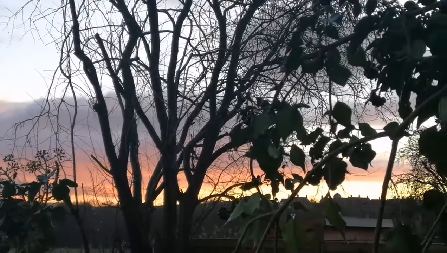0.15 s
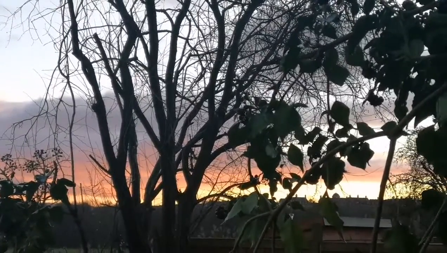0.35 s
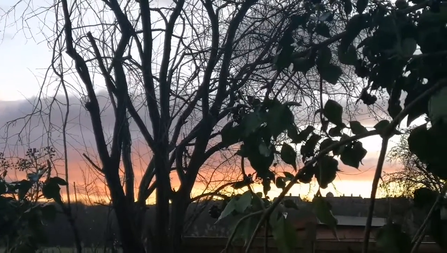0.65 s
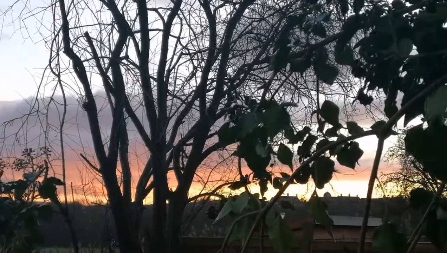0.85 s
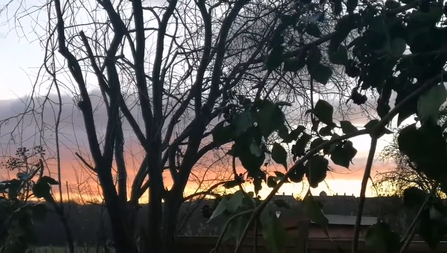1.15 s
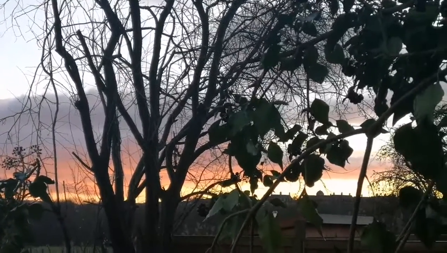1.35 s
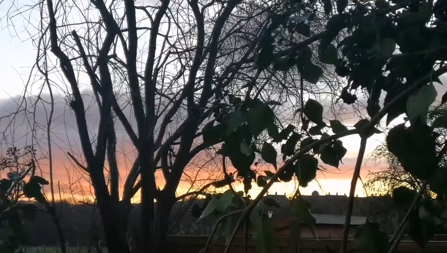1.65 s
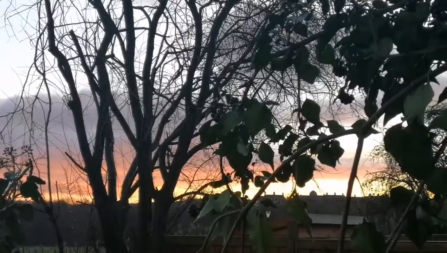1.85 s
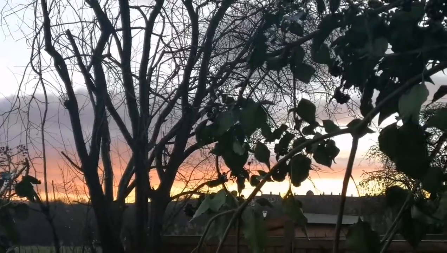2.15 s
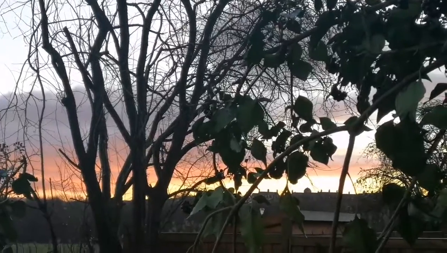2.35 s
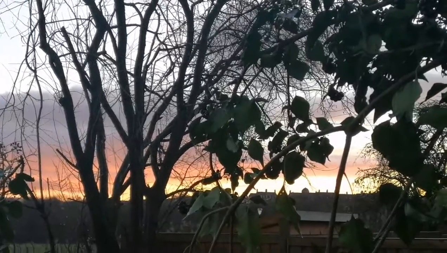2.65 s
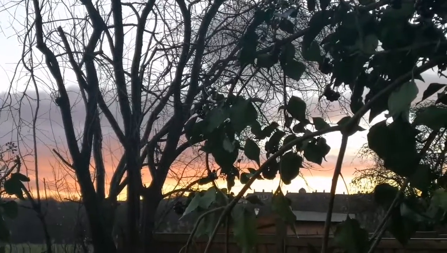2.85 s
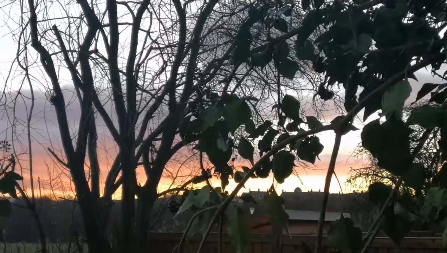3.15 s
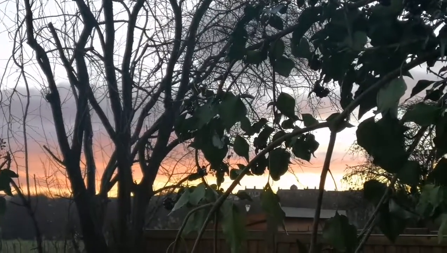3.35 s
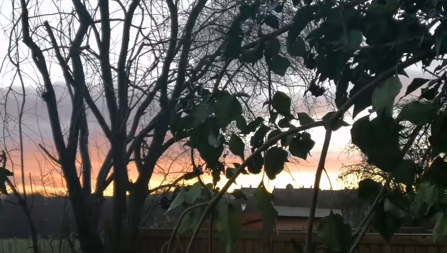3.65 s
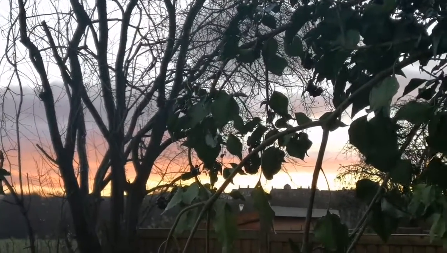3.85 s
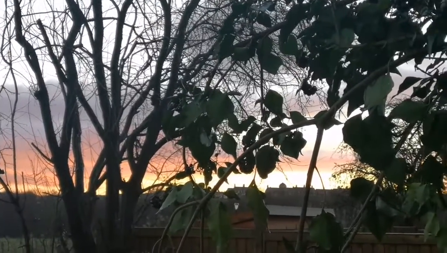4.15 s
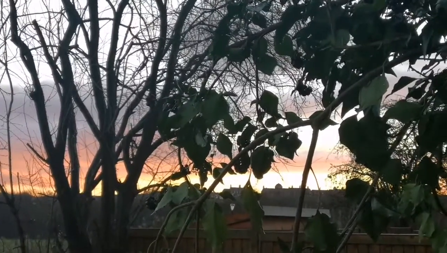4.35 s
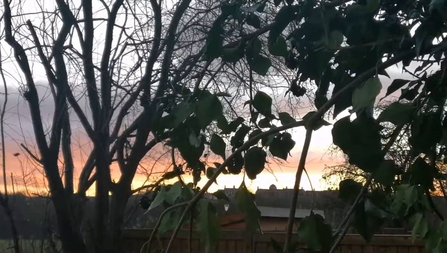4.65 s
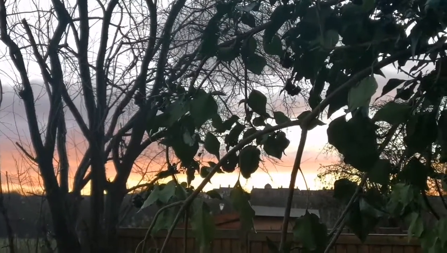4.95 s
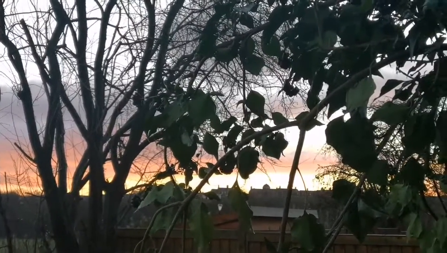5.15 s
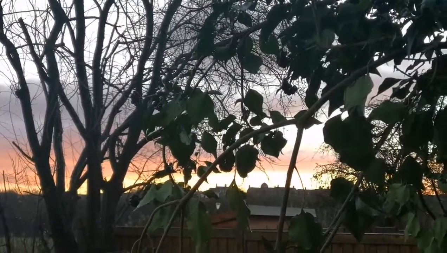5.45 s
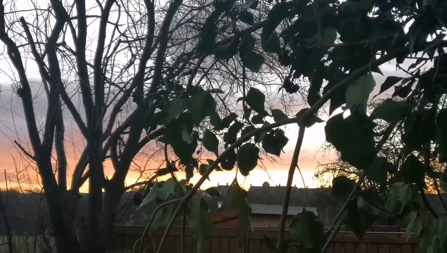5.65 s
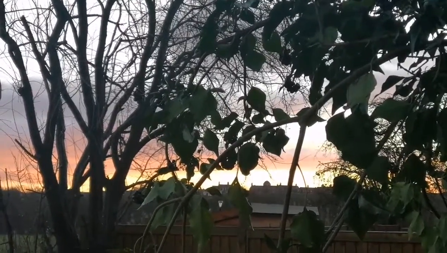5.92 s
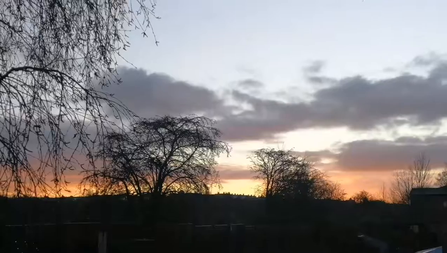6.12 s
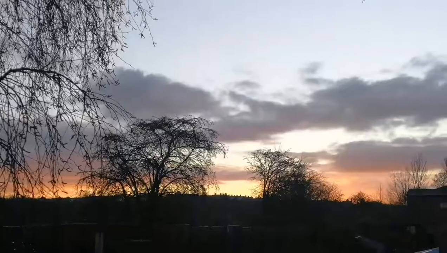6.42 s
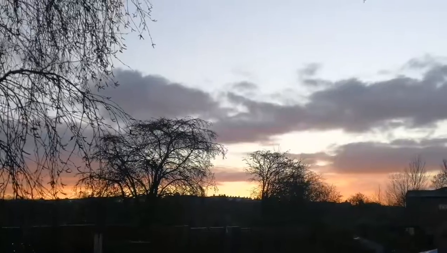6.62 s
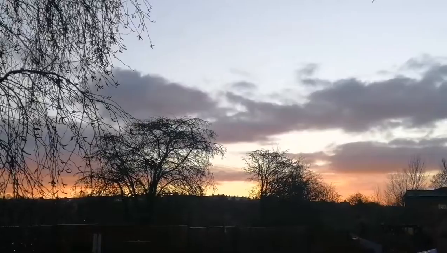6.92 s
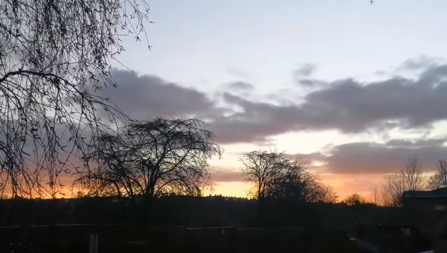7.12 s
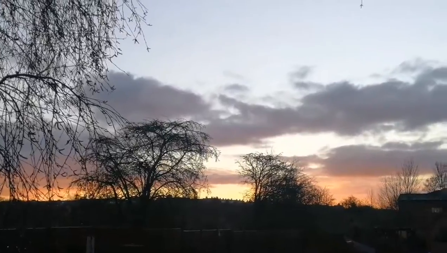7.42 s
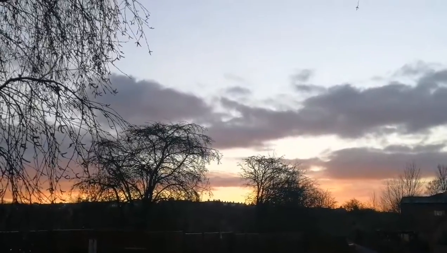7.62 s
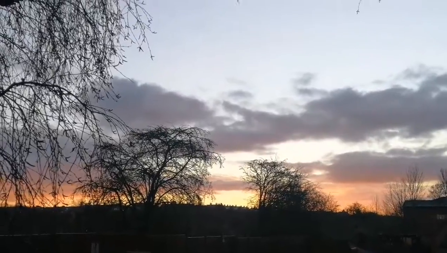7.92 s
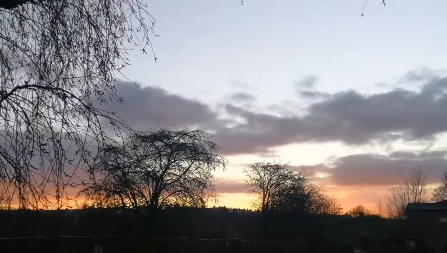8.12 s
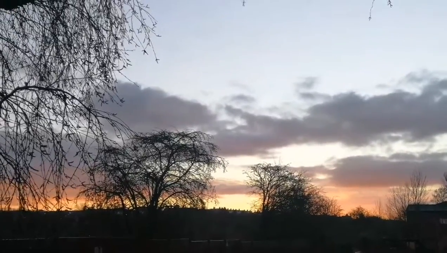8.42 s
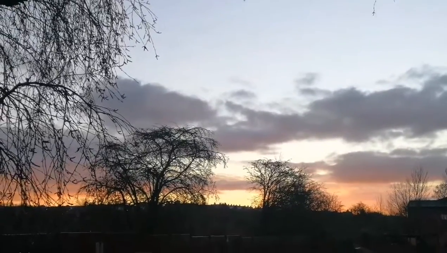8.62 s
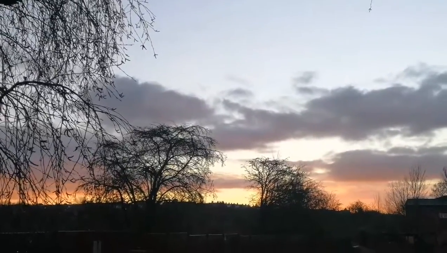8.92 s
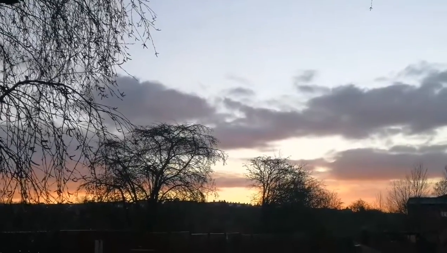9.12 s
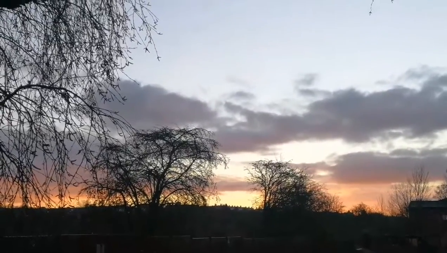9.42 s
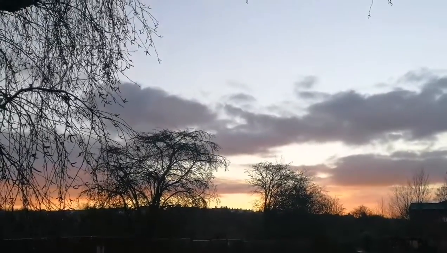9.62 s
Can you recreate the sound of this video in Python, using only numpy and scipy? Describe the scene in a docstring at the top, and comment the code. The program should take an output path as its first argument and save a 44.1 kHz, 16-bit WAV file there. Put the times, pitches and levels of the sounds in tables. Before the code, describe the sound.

Sparse robin phrases and faint far birds over a hushed dawn garden, with soft handling bumps, then a small motor whirring and one buzzing knock.

```python
"""Dawn in a garden, heard by a hand-held phone. Throughout: filtered-noise air and distant road hush, faint far
birds (warbled sine notes with noise echoes), and from 0.8 s finger bumps (filtered pushes) and ticks (noise
bursts). From 1 s a robin on the left: phrases of warbled sines. At 2.2 s a harsh churr: noise puffs through a
throat filter. At 5.94 s a brief silence; from 6.03 to 8.66 s a small motor, probably the lens drive: noise
repeated every turn, plus gear hum; at 6.24 s one vibrator knock: a ringing sine with rattle. The robin's last
phrase starts at 9 s."""
import sys
import numpy as np
from scipy import signal
from scipy.fft import rfft, irfft, next_fast_len
from scipy.io import wavfile

SR = 44100
rng = np.random.default_rng(int(sys.argv[2]) if len(sys.argv) > 2 else 0)


def log_audio(samples):
    """Write samples as a 16-bit WAV file to the path given in sys.argv[1]."""
    # one column per channel
    frames = np.atleast_2d(samples).T
    # limit to full scale, then quantise
    limited = np.clip(frames, -1, 1)
    pcm = np.round(limited * 32767).astype(np.int16)
    wavfile.write(sys.argv[1], SR, pcm)


N = 431298
TIME = np.arange(N) / SR

# Spectrum of still air: (f/Hz, density/dB per Hz)
AIR_SPECTRUM = [(20, -95), (70, -90), (170, -96.5), (300, -96), (600, -101), (1500, -105), (3000, -109),
                (4500, -111.5), (7000, -113), (9200, -112.5), (11500, -117), (15500, -119)]
# Spectrum of the road before its level curve: (f/Hz, density/dB per Hz)
ROAD_SPECTRUM = [(500, -115), (850, -101), (1200, -93), (1600, -97.5), (2100, -100), (3000, -110),
                 (4500, -125)]
# Slow road level: (t/s, level/dB)
ROAD_LEVEL_DB = [(0, 1.5), (1.5, -1.5), (3, 0.5), (4.5, -1.5), (5.9, -2.5), (8.8, -2), (9.78, -4.5)]
# Syllables of all birds: name -> (glide/octaves, middle above ends/octaves, warble/Hz before whistle's 0.786,
# second voice re first/dB)
SYLLABLE_SHAPES = {"flick": (0.21, 0.06, 50, -9), "rise": (.07, -0.04, 60, -11),
                   "arch": (.07, 0.037, 3, -40), "fall": (-.38, .04, 169, -5),
                   "sag": (-.07, -0.01, 4.5, -40), "trill": (0.05, 0.09, 132, -6),
                   "hold": (0.05, -0.03, 14, -40), "scoop": (.13, -0.12, 5, -40),
                   "slide": (.19, -.03, 12, -40), "droop": (-0.03, .02, 29.5, -18),
                   "zip": (.11, .03, 140, -20), "cup": (.005, -.035, 2, -40), "sigh": (-.09, .03, 25, -40)}
# Far notes, level before the mix: (start t/s, length/s, middle f/Hz, level/dB, syllable)
FAR_NOTES = [ (0.753, .012, 3200, -63, "fall"), (3.386, .24, 3690, -77, "hold"),
             (3.42, 0.22, 3470, -76, "hold"), (3.762, .09, 8450, -67, "zip"),
             (3.876, .15, 8070, -74.5, "sag"), (4.019, .11, 8680, -72.5, "zip"),
             (8.62, 0.17, 3500, -76, "droop"), (8.658, 0.106, 2480, -76.5, "droop"),
             (8.647, 0.15, 1040, -70.5, "hold"), (9.68, .12, 5400, -78, "droop")]
# Repeated two-tone call of one far bird, level before the mix: (start t/s, level/dB)
TWO_TONE_CALLS = [(.419, -82), (1.546, -81), (2.968, -85), (3.782, -74), (4.918, -81)]
# Throat resonances of the churring bird: (f/Hz, level/dB)
THROAT_RESPONSE = [(1200, -30), (1900, 2.5), (2450, 0), (2950, -9.5), (3650, -4.5), (4020, 2), (4400, -2),
                   (4800, -21), (6500, -46)]
# Finger bumps: (t/s, peak of the thud/dB, touch)
FINGER_BUMPS = [ (.882, -48, "tap"), (1.342, -47, "nail"), (1.468, -48, "nail"), (2.242, -48, "tap"),
                (2.294, -46.5, "tap"), (2.447, -31.5, "tap"), (2.63, -44, "tap"), (3.084, -46.5, "nail"),
                (3.425, -43, "tap"), (3.767, -49, "tap"), (4.075, -43.5, "nail"), (4.106, -38, "tap"),
                (5.263, -33, "tap"), (5.599, -43, "tap"), (5.717, -45.5, "tap"), (5.864, -25, "press"),
                (6.041, -42, "squeeze"), (6.11, -39, "press"), (8.002, -31, "tap"),
                (8.097, -35.5, "squeeze"), (8.191, -31, "squeeze"), (9.031, -27.5, "press"),
                (9.649, -30, "press")]
# Finger touches: name -> (upper edge f/Hz, lower edge f/Hz, raw tick re thud/dB, raw shudder re push/dB)
TOUCH_KINDS = {"nail": (560, 134, -3, -9), "tap": (260, 117, -22, -5.5), "press": (350, 36.5, -18.5, -21),
               "squeeze": (97, 54, -43, -11)}
# Dry case ticks and scuffs, with the motor's switch clicks at its start and stop (6.11, 8.66 s), # before
# colouring: (t/s, level/dB, decay/s, treble snap/dB)
CASE_TICKS = [(0.76, -57, .004, 0), (5.867, -29, 0.00033, -40), (6.113, -26, 0.00058, -28),
              (8.661, -29.5, 0.00046, -6), (9.091, -48.5, .007, -14), (9.254, -41.5, .0035, -7),
              (9.268, -47.5, .003, 9.5), (9.275, -56, 0.024, -3)]
# Case response to ticks: (f/Hz, level/dB)
TICK_RESPONSE = [(200, -19), (800, 9.5), (1500, -0.5), (2100, -2.5), (3100, -8.5), (4500, -18.5),
                 (7000, -48), (12000, -59)]
# Treble snap of slips: (f/Hz, level/dB)
SNAP_RESPONSE = [(2500, -23), (5000, -17), (6300, -7), (8000, -18), (11000, -33), (15000, -36)]
# Handling rumble before its level curve: (f/Hz, density/dB per Hz)
RUMBLE_SPECTRUM = [(12, -74.5), (30, -75), (60, -68), (110, -83), (300, -99), (700, -115)]
# Rumble of the unsteady hand: (t/s, level/dB)
HAND_LEVEL_DB = [(0, -21), (1.9, -25), (2.4, -13), (4.8, -22), (5.6, -9.5), (7.8, -16.5), (8.15, -3.5),
                 (9.78, -8)]
# Case response to the vibrator's rattle: (f/Hz, level/dB)
RATTLE_RESPONSE = [(400, -21), (750, 11), (950, -1), (1140, 4.5), (1450, -10), (2100, 7), (2700, -15.5),
                   (3200, -13.5), (6500, -27), (8500, -14), (11500, -38), (15000, -26)]
# Motor through the body, before the effort gain: (f/Hz, left/dB per Hz, right/dB per Hz)
MOTOR_RESPONSE = [(90, -99, -99), (203, -79.5, -77), (322, -77, -73), (404, -71, -73), (468, -80.5, -77),
                  (560, -78, -68), (555, -79.5, -77.5), (804, -85.5, -75), (1310, -90, -79.5),
                  (2130, -99, -84), (4400, -105, -88), (6800, -118, -97.5), (8330, -117, -91),
                  (9410, -120, -92.5), (11900, -130, -119)]
# Humming gears, levels before pan and effort: (teeth, level/dB, catch level/dB, catch place in turn t/s, catch width/s)
HUM_GEARS = [(40, -62, -44.5, 0.044, 0.0049), (50, -70, -56, 0.0014, 0.013), (29, -70, -57, .0935, 0.012)]
# Robin's notes, level before the mix: (start t/s, length/s, middle f/Hz, level/dB, syllable)
ROBIN_NOTES = [ (1.029, .023, 3300, -55, "flick"), (1.046, 0.045, 3430, -46.5, "rise"),
               (1.099, 0.058, 3480, -53.5, "rise"), (1.151, 0.1, 3870, -60, "rise"),
               (1.3, .026, 3300, -52.5, "flick"), (1.325, 0.032, 3400, -53, "flick"),
               (1.367, .055, 3440, -59, "rise"), (4.24, .028, 4030, -69, "flick"),
               (4.279, 0.029, 3420, -55, "hold"), (4.308, .061, 3685, -40.5, "arch"),
               (4.383, .033, 3450, -52, "fall"), (4.406, 0.078, 2660, -56, "sag"),
               (4.492, .03, 3200, -53.5, "trill"), (4.574, 0.049, 3180, -60, "trill"),
               (4.579, 0.025, 4480, -72, "rise"), (4.632, .033, 3900, -65, "trill"),
               (4.665, 0.038, 3830, -54, "fall"), (4.73, 0.048, 3450, -56.5, "trill"),
               (4.791, .17, 3680, -68.5, "droop"), (4.83, 0.19, 3320, -70.5, "droop"),
               (5.09, 0.051, 3400, -59, "trill"), (5.113, .028, 2350, -65, "droop"),
               (5.133, 0.024, 4200, -62, "trill"), (5.149, .035, 3200, -53, "rise"),
               (5.189, .018, 4280, -58.5, "trill"), (5.208, 0.013, 3720, -51.5, "flick"),
               (5.226, .035, 3280, -56.5, "trill"), (5.321, 0.018, 3780, -52, "flick"),
               (5.349, .019, 3650, -49, "scoop"), (5.371, .037, 4000, -53, "trill"),
               (5.431, 0.041, 3920, -57, "flick"), (6.96, .048, 4300, -62, "fall"),
               (7.027, 0.067, 3600, -60.5, "fall"), (7.193, 0.037, 4200, -55, "rise"),
               (7.315, .077, 3450, -56, "sag"), (8.996, .037, 3580, -60, "scoop"),
               (9.06, 0.038, 4180, -54.5, "cup"), (9.154, 0.02, 4480, -58, "cup"),
               (9.238, 0.051, 4010, -60, "sag"), (9.354, 0.11, 3705, -67, "slide"),
               (9.467, .11, 4220, -74.5, "hold")]
# Echo gain as the robin turns between phrases: (t/s, level/dB)
ROBIN_ECHO_DB = [(1.2, -2), (4.6, 0), (5.4, 1.5), (7.2, 0.5), (9.2, -5)]

SECOND_VOICE_OCTAVES, SECOND_VOICE_LAG_S = -.06, .007
LOW_TONE_HZ, LOW_TONE_S = 5070, .15
HIGH_TONE_HZ, HIGH_TONE_S, HIGH_TONE_DB = 5880, 0.083, -1.5  # level re the low tone
CHURR_S, CHURR_ATTACK_S, CHURR_HOLD_S, CHURR_RELEASE_S = 2.235, 0.076, 0.27, 0.077
CHURR_DB = -60  # before the mix
SILENCE_START_S, SILENCE_END_S = 5.943, 6.0
MOTOR_ON_S, MOTOR_OFF_S, TURN_S = 6.034, 8.662, .095828
MOTOR_DB, START_SURGE_DB, SETTLE_S = -1, 4.5, 0.21
DRIVE_S, BRAKE_S = .0225, .019
KNOCK_DB, RING_DB, RING_T60_S = -11.3, -34, .7
TOP_HZ = 15750


def undb(db):
    """Decibels to gain."""
    return 10 ** (np.asarray(db) / 20)


def curve(rows):
    """Gain over time from (t/s, level/dB) rows."""
    return undb(np.interp(TIME, *np.transpose(rows)))


def colour(x, points):
    """Filter by (f/Hz, level/dB) points joined on a log-frequency axis."""
    size = next_fast_len(x.shape[-1], True)
    hz, db = np.transpose(points)
    log_hz = np.log(np.fft.rfftfreq(size, 1 / SR) + 1)  # +1 avoids log 0
    gain = undb(np.interp(log_hz, np.log(hz), db))
    return irfft(rfft(x, size) * gain, size)[..., :x.shape[-1]]


def butter(x, hz, kind, order=2):
    """Butterworth low- or high-pass."""
    sos = signal.butter(order, min(hz, SR / 2 - 1), kind, fs=SR, output="sos")
    return signal.sosfilt(sos, x)


def white(channels=2):
    """Independent noises of 0 dB per Hz."""
    return rng.standard_normal((channels, N)) * np.sqrt(SR / 2)


def walk(rate_hz):
    """Random values, rate_hz new ones a second, joined by lines."""
    return np.interp(TIME * rate_hz, np.arange(4096), rng.standard_normal(4096))


def ports(x, pan_db=0, lag_samples=34):
    """One sound at both microphones: left louder by pan_db and later by lag_samples."""
    left = np.pad(x, (lag_samples, 0))[:N] * undb(pan_db / 2)
    right = x * undb(-pan_db / 2)
    return np.array([left, right])


def add(track, start_s, x):
    """Mix a sound in at a time."""
    i = max(int(start_s * SR), 0)
    track[i:i + len(x)] += x[:max(N - i, 0)]


def garden(x, early_s, late_s, late_db):
    """Dense echoes off trunks and fences plus a faint tail from far trees: decaying noise of unit energy."""
    t = TIME[:SR]
    onset = 1 - np.exp(-t / 0.0028)
    decay = np.exp(-t / early_s) + undb(late_db) * np.exp(-t / late_s)
    echoes = rng.standard_normal((2, SR)) * onset * decay
    echoes /= np.sqrt(np.sum(echoes ** 2, axis=1, keepdims=True))
    return signal.fftconvolve(x[None], echoes, axes=1)[:, :N]


def whistle(length_s, first_hz, middle_hz, last_hz, warble_hz, warble_rate_hz=170, edge=0.097):
    """Note of rms near 1: a sine arching through three pitches, shaken by a fast uneven warble."""
    t = TIME[:max(int(length_s * SR), 2)]
    u = t / t[-1]
    # parabola through the three pitches
    arch_hz = first_hz * (1 - u) * (1 - 2 * u) + middle_hz * 4 * u * (1 - u) + last_hz * u * (2 * u - 1)
    warble = np.interp(t * warble_rate_hz, np.arange(64), rng.standard_normal(64))
    hz = arch_hz + 0.786 * warble_hz * warble
    tone = np.sin(2 * np.pi * np.cumsum(hz) / SR)
    return np.sqrt(2) * signal.windows.tukey(len(t), edge) * tone


def syllable(length_s, hz, db, name):
    """Stock note; the other side of the syrinx adds a lower, later voice, audible in rough notes."""
    glide, arch, warble_hz, second_db = SYLLABLE_SHAPES[name]
    pitches_hz = hz * 2 ** np.array([-glide / 2 - arch, 0, glide / 2 - arch])
    first = whistle(length_s, *pitches_hz, warble_hz)
    second = whistle(length_s, *(pitches_hz * 2 ** SECOND_VOICE_OCTAVES), warble_hz)
    lag = int(SECOND_VOICE_LAG_S * SR)
    both = np.pad(first, (0, lag)) + undb(second_db) * np.pad(second, (lag, 0))
    return undb(db) * both / np.hypot(1, undb(second_db))


def once_a_turn(place_s, width_s):
    """Gaussian swell at the same place in every motor turn."""
    away_s = (TIME - MOTOR_ON_S - place_s + TURN_S / 2) % TURN_S - TURN_S / 2
    return np.exp(-(away_s / width_s) ** 2)


def background(shared_hz=330, waver_db=1.37):
    """Still air, its bass alike on both sides, and tyres on a distant road: shaped noise, the road wavering."""
    shared = ports(butter(white(channels=1)[0], shared_hz, "low"))
    air = colour(shared + butter(white(), shared_hz, "high"), AIR_SPECTRUM)
    road = colour(0.81 * white() + 0.42 * ports(white(channels=1)[0]), ROAD_SPECTRUM)
    return air + road * curve(ROAD_LEVEL_DB) * undb(waver_db * walk(6))


def far_birds(chorus_db=-86, count=60):
    """Thin calls with echoes stronger than the direct sound, over a faint chorus at random times."""
    song = np.zeros(N)
    for start_s, length_s, hz, db, name in FAR_NOTES:
        add(song, start_s, syllable(length_s, hz, db, name))
    for start_s, db in TWO_TONE_CALLS:
        add(song, start_s, syllable(LOW_TONE_S, LOW_TONE_HZ, db, "sigh"))
        add(song, start_s + .014, syllable(HIGH_TONE_S, HIGH_TONE_HZ, db + HIGH_TONE_DB, "droop"))
    for when, span, pitch, bend, size in rng.random((count, 5)):
        hz = 1500 * 2 ** pitch
        note = whistle(0.0563 + 0.123 * span, hz, hz * (.9 + 0.22 * bend), hz, 88)
        add(song, when * N / SR, undb(chorus_db + 9.5 * size) * note)
    echoes = garden(song, early_s=0.026, late_s=0.2, late_db=-12.5)
    return undb(-6.5) * ports(song, pan_db=14.5) + undb(2.0) * echoes


def churr(pulse_hz=110, jitter=.25, puff_share=0.68, pan_db=5):
    """Harsh scold: fast uneven puffs of air ring the throat, blurred by the trees."""
    phase = np.cumsum(pulse_hz * (1 + jitter * walk(90))) / SR % 1
    puffs = np.exp(-phase / puff_share) * rng.standard_normal(N)
    rasp = colour(puffs, THROAT_RESPONSE)
    corners_s = CHURR_S + np.cumsum([0, CHURR_ATTACK_S, CHURR_HOLD_S, CHURR_RELEASE_S])
    call = undb(CHURR_DB) * rasp / rasp.std() * np.interp(TIME, corners_s, [0, 1, 1, 0])
    echoes = garden(call, early_s=.04, late_s=0.28, late_db=-6)
    return undb(-8) * ports(call, pan_db=pan_db) + echoes * undb([[0], [-pan_db]])


def handling(push_s=0.0035, shudder_s=0.024, slip_s=0.0023, touch_snap_db=-22):
    """Bumps: a quick push and slower shuddering release, rung by the bass cut; ticks: tiny slips of noise, and
    the motor's switch clicks as it starts and stops, also short noise bursts."""
    thuds, slips, snaps = np.zeros((3, N))
    t = TIME[:SR // 5]
    touch_ticks = []
    for start_s, db, touch in FINGER_BUMPS:
        upper_hz, lower_hz, tick_db, shudder_db = TOUCH_KINDS[touch]
        shudder = undb(shudder_db) * np.exp(-t / shudder_s) * rng.standard_normal(len(t))
        push = np.exp(-t / push_s) + shudder
        thud = butter(butter(push, upper_hz, "low"), lower_hz, "high", order=4)
        add(thuds, start_s, undb(db) * thud / np.abs(thud).max())
        touch_ticks.append((start_s, db + tick_db, slip_s, touch_snap_db))
    for start_s, db, decay_s, snap_db in CASE_TICKS + touch_ticks:
        slip = undb(db) * np.exp(-t / decay_s) * rng.standard_normal(len(t))
        add(slips, start_s, slip)
        add(snaps, start_s, slip * undb(snap_db))
    ticks = colour(slips, TICK_RESPONSE) + colour(snaps, SNAP_RESPONSE)
    rumble = colour(white(channels=1)[0], RUMBLE_SPECTRUM) * curve(HAND_LEVEL_DB)
    return ports(thuds + rumble) + undb(9.0) * ports(ticks, pan_db=5, lag_samples=30)


def vibrator(spring_hz=231, rattle_db=-26, kick_s=6.243):
    """Sprung mass driven, braked, left to ring; until braked it rattles the case at both ends of its swing."""
    t = TIME - kick_s
    stop_s = DRIVE_S + BRAKE_S
    swing = np.sin(2 * np.pi * spring_hz * t)
    reach = np.interp(t, [0, DRIVE_S, stop_s], [0, undb(KNOCK_DB), undb(RING_DB)])
    ringing = np.exp(-np.log(1000) * np.maximum(t - stop_s, 0) / RING_T60_S)
    knock = swing * reach * ringing
    contact = (.5 + swing ** 2) * (t > 0) * (t < stop_s) * np.exp(-np.abs(t) / 0.073)
    rattle = colour(contact * rng.standard_normal(N), RATTLE_RESPONSE)
    return ports(knock, lag_samples=36) + undb(rattle_db) * ports(rattle, pan_db=-7.0)


def lens_motor(repeat_hz=1900, loose=0.5, stall=0.41, stall_s=0.023, stall_hz=650):
    """Gears hum, grind alike every turn and catch once in it; higher up the friction noise is ever new."""
    size = round(TURN_S * SR)
    turn = irfft(np.exp(2j * np.pi * rng.random(size // 2 + 1)), size)  # flat spectrum, random phase
    grind = np.resize(turn / turn.std(), N) * np.sqrt(SR / 2)
    friction, play = white()
    low = butter(grind + loose * play, repeat_hz, "low", order=1)
    drive = low + butter(friction, repeat_hz, "high", order=1)
    # low grinding eases while the first gear catches
    first_catch_s = HUM_GEARS[0][3]
    low_grind = colour(drive, [(stall_hz, 0), (2 * stall_hz, -40)])
    drive = drive - stall * once_a_turn(first_catch_s, stall_s) * low_grind
    hz, left_db, right_db = np.transpose(MOTOR_RESPONSE)
    left, right = ports(drive, lag_samples=26)  # motor close to the right microphone
    body = np.array([colour(left, np.c_[hz, left_db]), colour(right, np.c_[hz, right_db])])
    hum = np.zeros(N)
    for teeth, db, catch_db, place_s, width_s in HUM_GEARS:
        # a few tight teeth swell the hum once a turn
        level = undb(db) + undb(catch_db) * once_a_turn(place_s, width_s)
        hum += level * np.sqrt(2) * np.sin(2 * np.pi * teeth * TIME / TURN_S)
    effort_db = MOTOR_DB + START_SURGE_DB * np.exp(-np.abs(TIME - MOTOR_ON_S) / SETTLE_S)
    running = (TIME > MOTOR_ON_S) & (TIME < MOTOR_OFF_S)
    return (body + ports(hum, pan_db=-6.5, lag_samples=26)) * undb(effort_db) * running


def robin(echo_pan_db=8, even_db=-57, echo_follows=0.65):
    """Phrases from the left; as when the bird turns its head, note levels vary less in the tree echo."""
    direct, scattered = np.zeros((2, N))
    for start_s, length_s, hz, db, name in ROBIN_NOTES:
        note = syllable(length_s, hz, db, name)
        add(direct, start_s, note)
        add(scattered, start_s, note * undb((1 - echo_follows) * (even_db - db)))
    echoes = garden(scattered * curve(ROBIN_ECHO_DB), early_s=0.047, late_s=0.22, late_db=-12.5)
    return undb(-3.5) * ports(direct, pan_db=11.5) + echoes * undb([[-1], [-echo_pan_db]])


def scene():
    """Background and birds outside, small noises of the phone."""
    return background() + far_birds() + churr() + handling() + vibrator() + lens_motor() + robin()


def record(dry):
    """All sound stops for an instant; a steep low-pass cuts the top."""
    live = (TIME < SILENCE_START_S) | (TIME > SILENCE_END_S)
    top_cut = signal.ellip(10, .2, 70, TOP_HZ, fs=SR, output="sos")  # ripple 0.2 dB, stopband 70 dB
    return signal.sosfilt(top_cut, dry * live)


dry = scene()
out = record(dry)
log_audio(out)
```